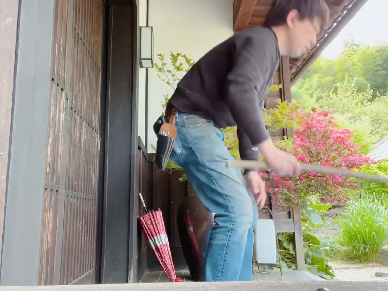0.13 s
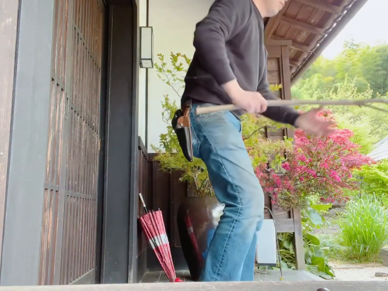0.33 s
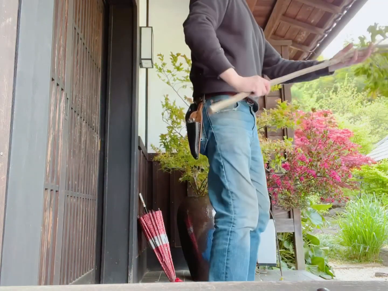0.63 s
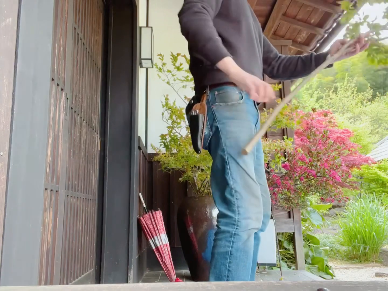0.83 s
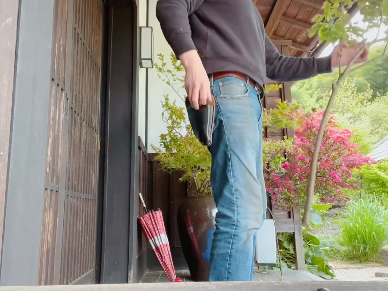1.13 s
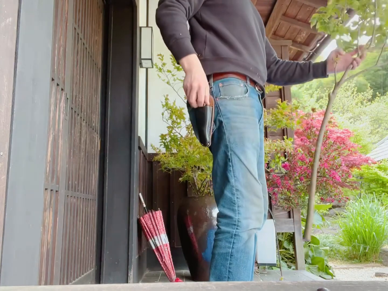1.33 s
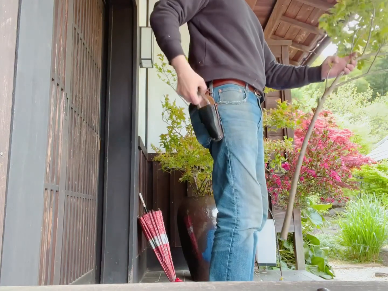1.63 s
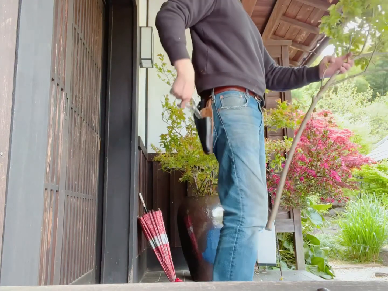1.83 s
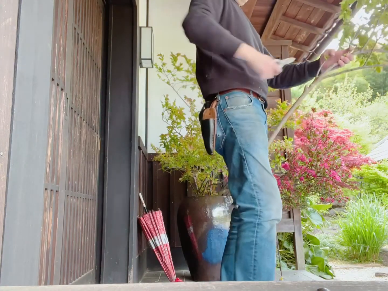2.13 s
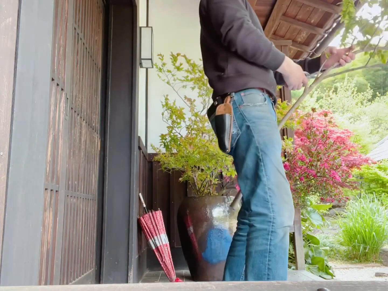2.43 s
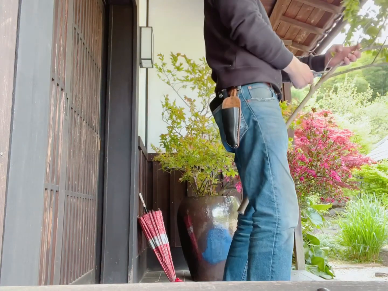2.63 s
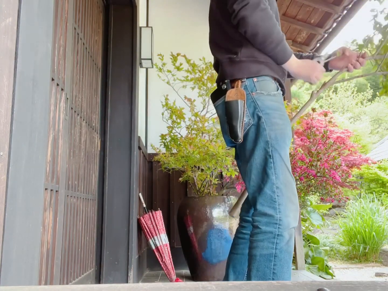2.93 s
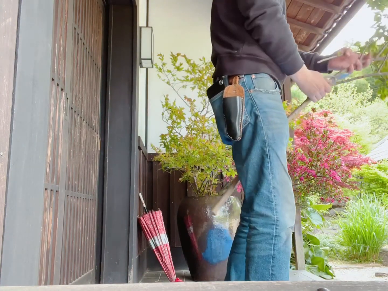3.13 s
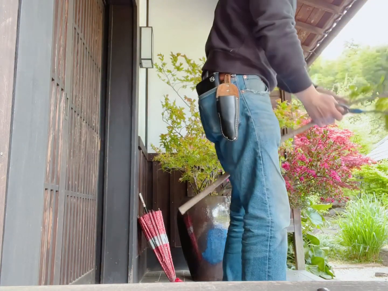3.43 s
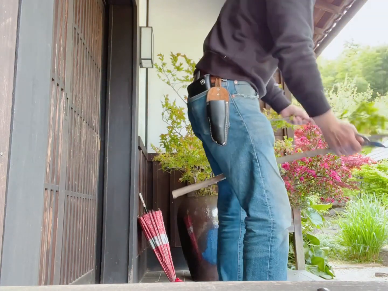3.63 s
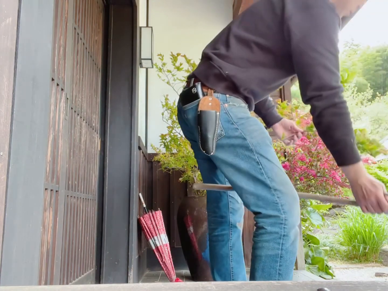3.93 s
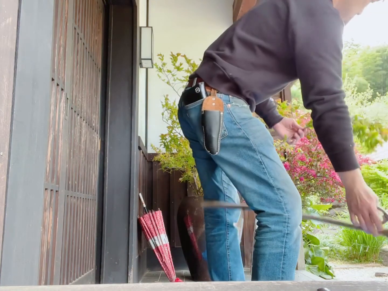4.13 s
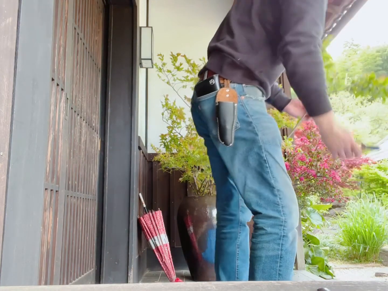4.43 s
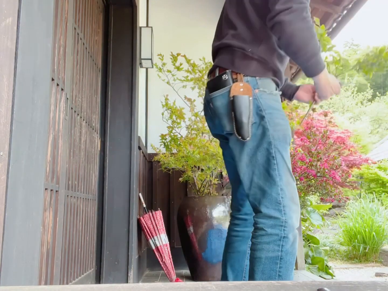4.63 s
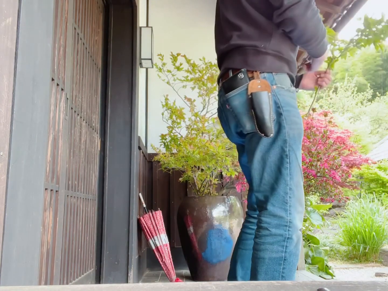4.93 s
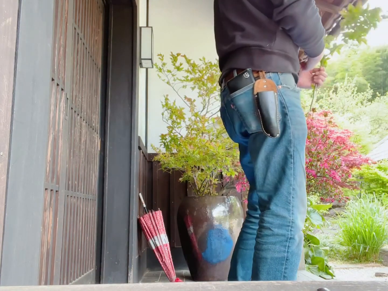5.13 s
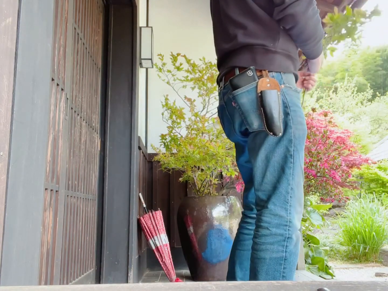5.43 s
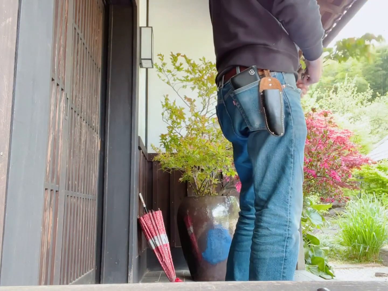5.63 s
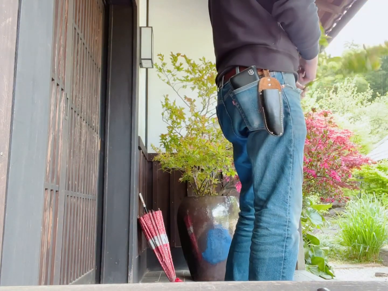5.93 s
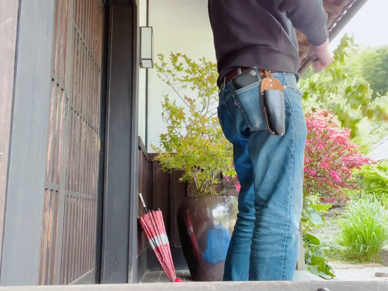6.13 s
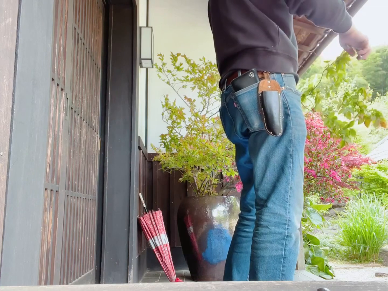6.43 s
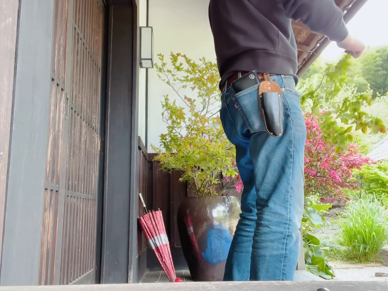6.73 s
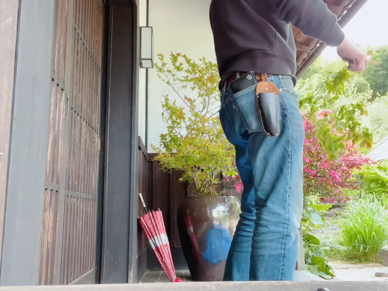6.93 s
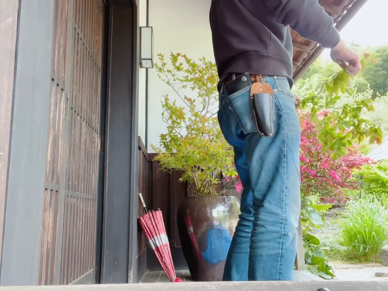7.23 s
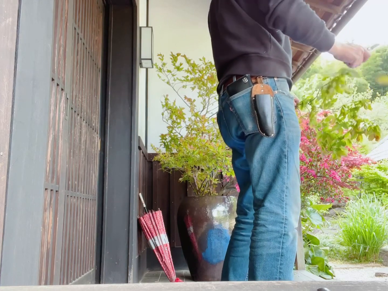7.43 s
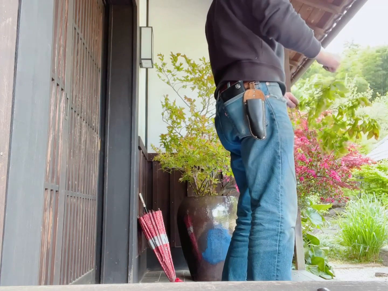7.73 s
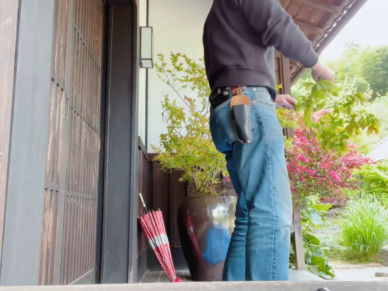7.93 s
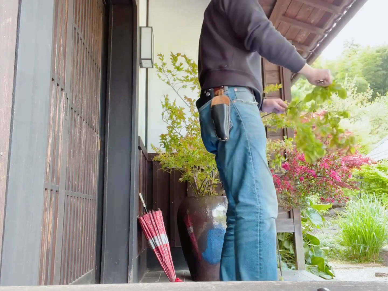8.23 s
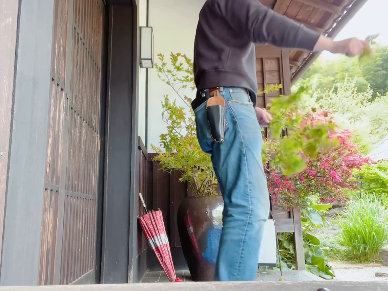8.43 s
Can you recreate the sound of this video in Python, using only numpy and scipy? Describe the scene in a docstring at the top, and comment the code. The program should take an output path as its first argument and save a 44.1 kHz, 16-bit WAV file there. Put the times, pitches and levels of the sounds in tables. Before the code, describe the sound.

Someone handles a leafy branch, draws steel shears from a leather holster with small rattles and clinks, and cuts a thick stem with a loud dry crack. The blades flick open, the branch drops with a thud and swish, and another is trimmed in bright ringing snips. The microphone is near; short porch echoes, distant coos and a soft rumble surround it.

```python
"""Steel pruning shears trim leafy branches on a wooden porch: filtered noise bursts clap, tuned modes ring on.
They scrape out of their holster, crack through a thick stem and spring open; later they snip twigs off another branch.
The cut branch lands as low wooden modes and a rush of leaves; rustle is grains and hiss shaped by each movement.
Soles scuff as soft bands of noise, and gliding tones call faintly as birds over a low outdoor rumble.
Wall, floor and eaves answer all but the rumble with scattered echoes and a short tail."""
import sys
import numpy as np
from scipy import signal
from scipy.fft import rfft, irfft
from scipy.io import wavfile
from scipy.ndimage import uniform_filter1d

SR = 44100
rng = np.random.default_rng(int(sys.argv[2]) if len(sys.argv) > 2 else 0)


def dump(signal):
    """Clip the signal to [-1, 1] and save it as 16-bit WAV at the path in sys.argv[1]."""
    limited = np.clip(np.atleast_2d(signal).T, -1, 1)
    pcm = np.round(limited * 32767).astype(np.int16)
    wavfile.write(sys.argv[1], SR, pcm)


N = 377937
TIME = np.arange(N) / SR  # s, the whole scene
RING = np.arange(SR // 2) / SR  # s, one short sound


def undb(db):
    """Decibels to gain."""
    return 10 ** (np.asarray(db) / 20)


def unit(x):
    """Scale to an energy of one."""
    return x / np.sqrt(np.sum(x ** 2))


def level(x, db):
    """Scale to an rms level."""
    return x * undb(db) / np.std(x)


def add(track, s, sound):
    """Mix a sound into a track from time s."""
    i = max(int(s * SR), 0)
    track[i:i + len(sound)] += sound[:max(len(track) - i, 0)]


def colour(x, points, size=4096):
    """Causal minimum-phase filter through (Hz, dB) points."""
    hz, db = np.transpose(points)
    f = np.maximum(np.fft.rfftfreq(size, 1 / SR), 1)
    curve_db = np.interp(np.log(f), np.log(hz), db)
    # folding the cepstrum forward puts no sound before its cause
    cepstrum = irfft(np.log(undb(curve_db)))
    cepstrum[1:size // 2] *= 2
    cepstrum[size // 2 + 1:] = 0
    impulse = irfft(np.exp(rfft(cepstrum)))
    return signal.fftconvolve(x, impulse)[:len(x)]


def tilted(points, slope_db):
    """Tilt a spectrum or modes by dB per octave about 7500 Hz, with the tilt level below 2500 Hz."""
    return [(hz, db + slope_db * np.log2(max(hz, 2500) / 7500), *rest) for hz, db, *rest in points]


def band(x, hz, width):
    """One broad resonance, width as a share of its centre."""
    return signal.lfilter(*signal.iirpeak(hz, 1 / width, fs=SR), x)


def body(x, resonances):
    """Several broad resonances driven together, with alternating signs."""
    return sum((-1) ** k * undb(db) * band(x, hz, width) for k, (hz, width, db) in enumerate(resonances))


def walk(rate):
    """Smoothed random drift with a spread of one, built from so many steps per second."""
    k = int(SR / rate)
    steps = np.repeat(rng.standard_normal(N // k + 1), k)
    smooth = uniform_filter1d(uniform_filter1d(steps, k), k)
    return level(smooth[:N], 0)


def burst(t60):
    """A dying flurry of tiny contacts: noise that falls 60 dB in t60 seconds."""
    return rng.standard_normal(len(RING)) * undb(-60 * RING / t60)


def ring(modes):
    """Decaying modes; grip and point of contact change them a little each time."""
    hz, db, t60 = np.transpose(modes)[:, :, None]
    size, shift = rng.standard_normal((len(modes), 2)).T[:, :, None]
    hz = hz * (1 + .005 * shift)
    db = db + 2.2 * size
    side = (-1) ** np.arange(len(modes))[:, None]
    partials = side * undb(db - 60 * RING / t60) * np.sin(2 * np.pi * hz * RING)
    return unit(np.sum(partials, axis=0))


def strokes(rows, sag_db_per_s, settle_db_per_s):
    """Each movement speeds up, slackens slowly, then dies away; overlapping ones add in power."""
    power = np.zeros(N)
    t = TIME[:SR]
    for s, rise, hold, db in rows:
        sag_db = sag_db_per_s * np.maximum(t - rise, 0)
        settle_db = settle_db_per_s * np.maximum(t - rise - hold, 0)
        speed = np.minimum(t / rise, 1) * undb(db - sag_db - settle_db)
        add(power, s, speed ** 2)
    return np.sqrt(power)


# outdoor bed, spectral shape: freq_hz [Hz], shape_db [dB]
GARDEN_COLOUR = [(20, -30.5), (34, -7.5), (74, 2.5), (123, -11), (187, -17.5), (310, -25), (738, -28),
                 (1190, -31.5), (4060, -36.5), (4810, -38.5), (7520, -37), (11100, -48), (16000, -46)]
# swell of the rumble: time_s [s], gain_db [dB]
RUMBLE_SWELL = [(0, 0), (1.4, -4), (2.7, 1), (3.3, -1), (4.4, 4), (5.8, 1.5), (6.5, -1.5), (8.5, -0.5)]


def garden():
    """Low distant rumble that swells slowly, under a faint even hiss of trees."""
    air = level(colour(rng.standard_normal(N), GARDEN_COLOUR, size=16384), -49.5)
    low = signal.sosfilt(signal.butter(1, 140, fs=SR, output="sos"), air)
    swell = undb(np.interp(TIME, *np.transpose(RUMBLE_SWELL)))
    return air + low * (swell - 1)


# distant birds: start_s [s], length_s [s], first_hz [Hz], last_hz [Hz],
# level_db [dB, before the direct and scattered mix]; the arch and waver bend the pitch between
BIRD_CALLS = [(.06, 0.11, 494, 478, -44), (0.1, 0.29, 385, 367, -57), (0.587, 0.44, 348, 360, -62.5),
              (.83, 0.21, 467, 480, -55.5), (1.23, 0.32, 495, 445, -53), (1.27, 0.24, 3810, 3990, -66),
              (2.049, 0.15, 1810, 2200, -60), (7.068, 0.07, 4700, 2590, -65),
              (7.543, 0.17, 3950, 3880, -64.5), (8.292, 0.089, 440, 430, -54)]
CALL_ARCH, CALL_WAVER = 0.033, .016  # pitch rise in mid call and unsteadiness, as shares
CALL_FLUTTER_DB = 2.5  # random flutter of level
TREES_T60_S = 0.35  # scatter of far calls among the trees


def birds():
    """Far off, low coos and thin whistles, each arching a little in pitch and blurred by the trees."""
    out = np.zeros(N)
    for s, length, first_hz, last_hz, db in BIRD_CALLS:
        n = int(length * SR)
        arch = np.sqrt(np.hanning(n))
        bend = 1 + CALL_ARCH * (arch - arch.mean()) + CALL_WAVER * walk(rate=300)[:n]
        hz = np.linspace(first_hz, last_hz, n) * bend
        swell = undb(db + CALL_FLUTTER_DB * walk(rate=50)[:n]) * arch
        add(out, s, swell * np.sin(2 * np.pi * np.cumsum(hz) / SR))
    scattered = signal.fftconvolve(out, unit(burst(TREES_T60_S)))[:N]
    return undb(-4.5) * out + undb(-3.0) * scattered


# shuffling soles: middle_s [s], level_db [dB, relative], centre_hz [Hz], half_length_s [s]
SOLE_SHUFFLES = [(.1, -53, 440, 0.16), (0.647, -49.5, 950, 0.07), (1.6, -54, 504, 0.18),
                 (2.219, -49.5, 200, .05), (3.042, -53, 654, .13), (4.642, -44.5, 1900, 0.052),
                 (5.351, -60, 234, 0.53), (5.94, -47, 123, .15), (5.968, -56.5, 270, 0.16)]


def soles():
    """Soft scuffs that swell and fade as the weight shifts."""
    out = np.zeros(N)
    for s, db, hz, half_length in SOLE_SHUFFLES:
        swell = np.hanning(int(half_length * SR * 2))
        scuff = rng.standard_normal(len(swell))
        for _ in range(2):
            scuff = band(scuff, hz, width=0.56)
        add(out, s - half_length, swell * level(scuff, db - 1))
    return out


# spectrum of leaves: freq_hz [Hz], shape_db [dB]
LEAF_SPECTRUM = [(120, -39.5), (200, -8), (480, -4), (899, -4.5), (1270, -8.5), (3300, -3.5), (5520, -3),
                 (6760, 1), (10700, -13), (13600, -11), (16000, -26)]


def leafy(x):
    """Thin leaf blades radiate a wide, uneven spectrum."""
    return colour(x, LEAF_SPECTRUM)


def twig_ticks():
    """Small dry taps within the rustle, each on a twig with its own pitch."""
    out = np.zeros(N)
    taps_per_s = 140
    for when, pitch, size in rng.random((int(taps_per_s * N / SR), 3)):
        hz = 900 * 8 ** pitch
        tap = unit(band(burst(t60=.012)[:SR // 20], hz, width=.3))
        add(out, when * N / SR, size ** 2 * tap)
    return level(out, -12)


# swings of the leafy branch: start_s [s], rise_s [s], hold_s [s], level_db [dB, relative]
# picked up, held upright, lowered, dropped; the next one drawn out, turned for trimming, lifted
BRANCH_SWINGS = [ (0.0, 0.0011, 0.017, -34), (.09, 0.036, 0.015, -40), (.275, 0.048, 0.061, -42.5),
                 (.5, 0.038, 0.068, -47.5), (.61, 0.022, 0.0071, -40), (.882, 0.006, .001, -48.5),
                 (.99, 0.027, 0.15, -55), (3.3, 0.094, 0.045, -49.5), (3.55, 0.18, 0.33, -60.5),
                 (3.89, 0.08, 0.07, -40.5), (4.06, 0.049, 0.058, -40.5), (4.27, 0.029, 0.073, -44),
                 (4.38, 0.01, 0.0057, -28), (4.52, 0.053, 0.4, -39.5), (5.13, 0.026, 0.069, -49.5),
                 (6.19, 0.054, .03, -61), (7.4, 0.05, 0.68, -61.5), (7.92, 0.077, 0.19, -50.5),
                 (8.275, 0.012, 0.018, -43.5), (8.45, 0.032, 0.05, -52.5)]
SWING_SAG_DB_PER_S, LEAF_SETTLE_DB_PER_S = 8, 106  # from the end of the rise; added after the hold
# the sleeve brushing holster and trousers: start_s [s], rise_s [s], hold_s [s], level_db [dB, relative]
SLEEVE_BRUSHES = [(1.5, 0.029, 0.17, -58), (1.78, 0.02, 0.027, -45.5), (1.91, 0.03, 0.099, -48.5),
                  (2.17, 0.059, 0.006, -38.5), (2.28, 0.062, 0.026, -43.5), (2.42, 0.02, 0.17, -55.5),
                  (2.64, 0.019, 0.044, -51.5), (2.85, 0.03, 0.5, -57.5), (3.22, 0.013, 0.04, -49.5)]
BRUSH_SAG_DB_PER_S, CLOTH_SETTLE_DB_PER_S = 7, 172.5
CONTACTS_PER_S = 1500


def rustle():
    """Countless leaf and cloth contacts in little flurries; papery body swells apart from hiss, twigs tick."""
    swings = strokes(BRANCH_SWINGS, SWING_SAG_DB_PER_S, LEAF_SETTLE_DB_PER_S)
    brushes = strokes(SLEEVE_BRUSHES, BRUSH_SAG_DB_PER_S, CLOTH_SETTLE_DB_PER_S)
    motion = np.hypot(swings, brushes)
    contacts = (rng.random(N) < CONTACTS_PER_S / SR) * rng.standard_normal(N)
    # a few contacts are much harder than the rest
    grains = contacts * undb(3.2 * np.minimum(rng.exponential(size=N), 5))
    hiss = rng.standard_normal(N)
    leaves = level(leafy(level(grains, -6.5) + level(hiss, -2)), -0.26)
    papery = signal.sosfilt(signal.butter(1, 2500, fs=SR, output="sos"), leaves)
    flurries = sum(part * undb(1.93 * walk(rate=60)) for part in (papery, leaves - papery))
    return (flurries + twig_ticks()) * motion


# shears scraping out of a stiff holster: start_s [s], rise_s [s], hold_s [s], level_db [dB, relative]
HOLSTER_SCRAPES = [(1.5, .08, 0.2, -55.5), (1.77, 0.029, 0.033, -55.5)]


def holster():
    """Steel catches and slips on leather in a quick, uneven rattle."""
    slips = (rng.random(N) < 120 / SR) * rng.standard_normal(N)  # about 120 per second
    rattle = signal.fftconvolve(slips, burst(t60=0.0091))[:N]
    leather = colour(rattle, [(300, -2), (650, 4), (1600, -3), (3000, -9), (8000, -28)])
    return level(leather, 0) * strokes(HOLSTER_SCRAPES, BRUSH_SAG_DB_PER_S, CLOTH_SETTLE_DB_PER_S)


# dull knocks of holster and wood: start_s [s], level_db [dB, relative], centre_hz [Hz]
DULL_KNOCKS = [(1.031, -35.5, 1400), (1.245, -39.5, 1550), (1.566, -41, 1720), (1.619, -38, 1410),
               (1.679, -36, 1100), (1.819, -28, 1360), (2.225, -28.5, 970), (8.283, -30, 1570)]


def knocks():
    """Blunt contacts excite one broad, soft resonance."""
    out = np.zeros(N)
    for s, db, hz in DULL_KNOCKS:
        thump = band(band(burst(t60=.04), hz, width=.7), hz, width=.7)
        add(out, s, undb(db) * unit(thump))
    return out


# modes of the dropped branch: freq_hz [Hz], level_db [dB, relative], t60_s [s]
BRANCH_MODES = [(121, -9, 0.14), (202, -1.5, 0.18), (276, -1.5, 0.04), (326, -8, 0.11), (425.6, -2, 0.082),
                (590, -15, 0.14), (974, -12, 0.092)]
# its landing: start_s [s], thud_db [dB, relative], leaves_db [dB, relative]
BRANCH_LANDING = [(4.387, -7.5, -34), (4.398, -24, -9)]


def landing():
    """The cut branch lands butt first with a woody thud, then its crown in a rush of leaves."""
    out = np.zeros(N)
    for s, thud_db, leaves_db in BRANCH_LANDING:
        add(out, s, undb(thud_db) * ring(BRANCH_MODES))
        crown = colour(leafy(burst(t60=0.15)), [(800, -5.5), (3000, -7.5), (13000, -6.0)])
        add(out, s, undb(leaves_db) * unit(crown))
    return out


# wood fibres breaking: start_s [s], level_db [dB, relative], t60_s [s], brightness_db_per_oct [dB/octave]
FIBRE_CRACKS = [(2.741, -24.5, 0.014, -4.5), (2.7429, -4, 0.041, 5), (2.748, 0.5, 0.0044, 7),
                (2.750, -10.5, 0.014, 0), (2.759, -4.5, 0.18, -0.5), (2.788, -19.5, .05, -5.5),
                (7.2887, -27, 0.03, -7), (8.284, -25, 0.029, -5.5)]
# spectrum of splintering wood: freq_hz [Hz], shape_db [dB]
SPLINTER_COLOUR = [(100, -17), (1000, -17), (3000, -9), (5400, -5), (7200, 3), (9000, -6.5), (11500, 3),
                   (14400, -6.5), (15500, -5)]
# body of the breaking stem: centre_hz [Hz], width [share of centre], level_db [dB, relative]
STEM_BODY = [(749, 0.62, -10.5), (1475, 0.1, -3), (2510, 0.18, -4), (3515, 0.14, -2)]


def cracks():
    """Fibres give way one after another, splintering brightly and driving the hollow body of the stem."""
    out = np.zeros(N)
    for s, db, t60, slope_db in FIBRE_CRACKS:
        fibres = burst(t60)
        splinter = unit(colour(fibres, tilted(SPLINTER_COLOUR, slope_db)))
        stem = undb(-7.5 - slope_db) * unit(body(fibres, STEM_BODY))
        add(out, s, undb(db) * (splinter + stem))
    return out


def wood():
    """Breaking, knocking and landing wood share one level."""
    return (cracks() + knocks() + landing()) * undb(13)


# closed shears, damped by the hand: centre_hz [Hz], width [share of centre], level_db [dB, relative]
GRIPPED_STEEL = [(3440, 0.08, -14.5), (4814, 0.09, -3.5), (6400, 0.056, 1.5), (7000, 0.073, 1),
                 (7845, 0.038, 8), (9810, 0.039, -3), (11690, 0.031, 4.5), (12860, 0.035, 1.5),
                 (13650, 0.026, 1), (14800, 0.12, -9)]


def clack(t60, slope_db):
    """Steel chatters against steel for a moment, its resonances broadened by the grip."""
    chatter = body(burst(t60), GRIPPED_STEEL)
    return unit(colour(chatter, tilted([(2500, 0), (16000, 0)], slope_db)))


# modes of the opening spring: freq_hz [Hz], level_db [dB, relative], t60_s [s]
SPRING_MODES = [(3420, -4.5, 0.044), (6920, -4.5, 0.087), (8660, -9, 0.12), (14200, 8, .012)]


def spring():
    """The blades unstick and fly open against their stop, with a rattling bounce."""
    out = np.zeros(N)
    add(out, 3.1238, undb(-4.0) * clack(t60=0.0052, slope_db=6) + undb(2.0) * ring(SPRING_MODES))
    add(out, 3.1254, undb(-1.0) * clack(t60=0.015, slope_db=3.5))
    return out


# modes of the shears' steel: freq_hz [Hz], level_db [dB, relative], t60_s [s]
STEEL_MODES = [(4680, -6, 0.1), (4950, -8, .09), (6690, -13, 0.15), (7190, -7.5, 0.15), (7400, -8.5, .1),
               (7500, -4, 0.1), (7840, 0, 0.14), (8600, -13, .11), (10070, -7.5, 0.108), (10600, -13.5, .1),
               (11600, -11.5, .11), (13100, -3.5, 0.083), (13800, -7, .07)]


def steel_ring(slope_db):
    """The freed steel rings on in its own modes, brighter or duller with the blow."""
    return ring(tilted(STEEL_MODES, slope_db))


# light touches: start_s [s], level_db [dB, relative], brightness_db_per_oct [dB/octave], ping_hz [Hz]
STEEL_TOUCHES = [(0.411, -31, 12, 11900), (0.691, -32, 13, 12160), (1.615, -29, -7.5, 6700),
                 (1.678, -34, -3, 8560), (1.763, -29.5, -13, 8500), (1.7944, -32, -10, 6860),
                 (1.818, -24.5, -5, 6950), (2.023, -29, -9, 6470), (2.047, -14, 2, 7180),
                 (2.352, -22.5, -16.5, 3530), (2.432, -30.5, -11.5, 9800), (2.4523, -29, -10.5, 7060),
                 (2.494, -23, -10, 6950), (2.7632, -8, -3, 7400), (2.773, -9, -0.5, 6970),
                 (3.241, -30, -16, 13200), (4.517, -9.5, -4.5, 13600), (5.9327, -39.5, 0, 6900),
                 (6.299, -29.5, -4.5, 7150), (6.930, -33.5, -12, 7130), (7.1392, -35, -0.5, 7300)]


def touches():
    """A light touch sounds mostly the part of the steel it lands on."""
    out = np.zeros(N)
    for s, db, slope_db, hz in STEEL_TOUCHES:
        contact = undb(-3.5) * clack(t60=0.037, slope_db=slope_db)
        ping = undb(-3.5) * unit(band(burst(t60=0.035), hz, width=0.035))
        steel = undb(-20.0) * steel_ring(slope_db)
        add(out, s, undb(db) * (contact + ping + steel))
    return out


# soft knock of a parting twig: centre_hz [Hz], width [share of centre], level_db [dB, relative]
TWIG_BODY = [(1680, 0.12, -5.5), (1980, 0.2, 4.5), (2600, 0.2, -3)]
# twig cuts: start_s [s], level_db [dB, relative], handle_delay_s [s, until the handles meet],
# twig_db [dB against steel, relative], brightness_db_per_oct [dB/octave]
TWIG_SNIPS = [(5.3284, -6, 0.0028, -6.5, 1), (6.0386, -18.5, 0.0025, -2.5, -2),
              (6.7205, -2, .0025, -2.5, 0.5), (7.2927, -2.5, 0.0029, -1, 2.5)]


def snips():
    """The blade breaks through a twig, the handles clap together, and the steel rings on."""
    out = np.zeros(N)
    no_bass = signal.butter(4, 1150, "high", fs=SR, output="sos")  # a thin twig radiates none
    for s, db, delay, twig_db, slope_db in TWIG_SNIPS:
        knock = signal.sosfilt(no_bass, burst(t60=.014))
        parting = sum(undb(size) * band(knock, hz, width) for hz, width, size in TWIG_BODY)
        twig = undb(twig_db - 11.5) * unit(parting)
        blade = undb(-1.5) * clack(t60=0.023, slope_db=slope_db - 6.5)
        add(out, s, undb(db) * (twig + blade))
        handles = undb(1.2) * clack(t60=0.021, slope_db=slope_db)
        add(out, s + delay, undb(db) * (handles + undb(-8.0) * steel_ring(slope_db)))
    return out


def shears():
    """Cuts and light touches of the same steel share one level."""
    return (snips() + touches()) * undb(12.5)


# porch reflections: delay_s [s], level_db [dB]
PORCH_WALLS = [(.0065, -16), (.0148, -14.5), (.025, -26.5), (0.034, -17)]


def porch(x):
    """Slatted wall, floor and eaves return scattered echoes, then a short tail that loses its treble first."""
    echo = np.zeros(len(RING))
    for delay, db in PORCH_WALLS:
        add(echo, delay, undb(db) * unit(burst(t60=0.019)))
    bright = unit(burst(t60=0.19))
    dull = unit(colour(burst(t60=0.3), [(100, 4), (3000, -7.5), (8000, -8.0), (15000, -22.5)]))
    add(echo, .012, undb(-13.0) * bright + undb(-15.5) * dull)
    return x + signal.fftconvolve(x, echo)[:N]


def scene():
    """Everything reaches one microphone, the same in both channels."""
    near = birds() + soles() + rustle() + holster() + wood() + spring() + shears()
    mono = garden() + porch(near)
    return np.array([mono, mono])


def record(dry):
    """The recorder rounds the sharpest peaks and cuts the top above 15750 Hz."""
    rounded = np.tanh(1.3 * dry) / 1.3
    return signal.sosfilt(signal.ellip(8, .2, 80, 15750, fs=SR, output="sos"), rounded)


dry = scene()
out = record(dry)
dump(out)
```